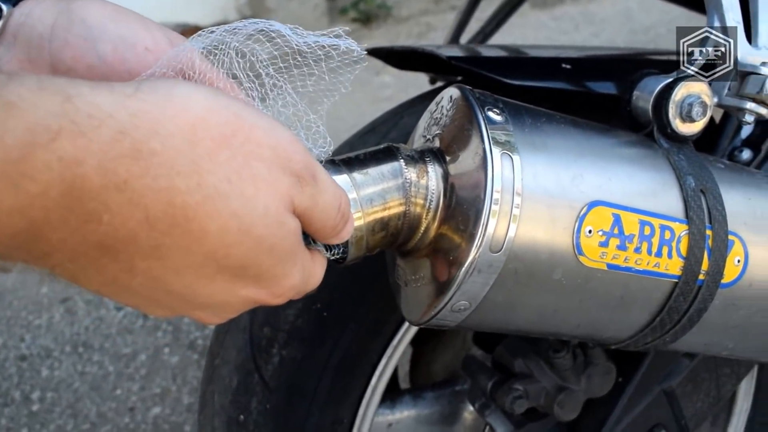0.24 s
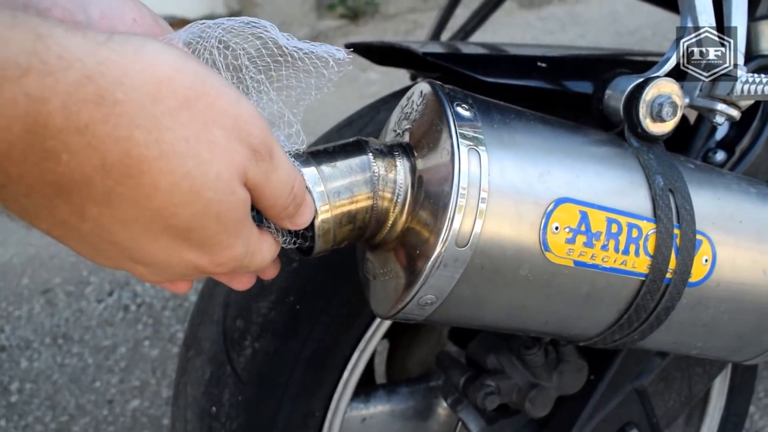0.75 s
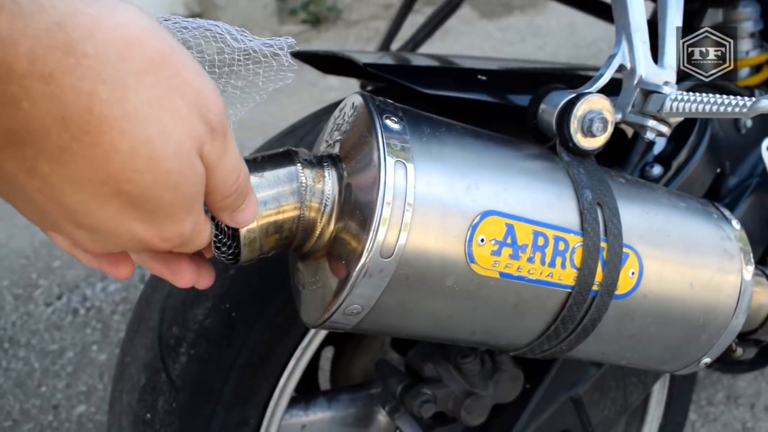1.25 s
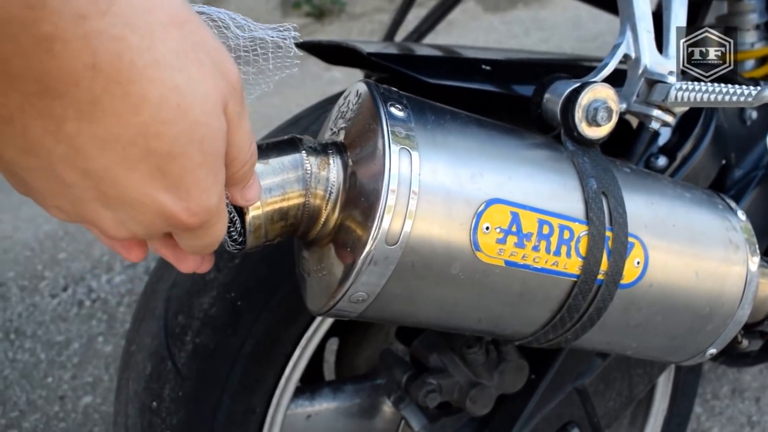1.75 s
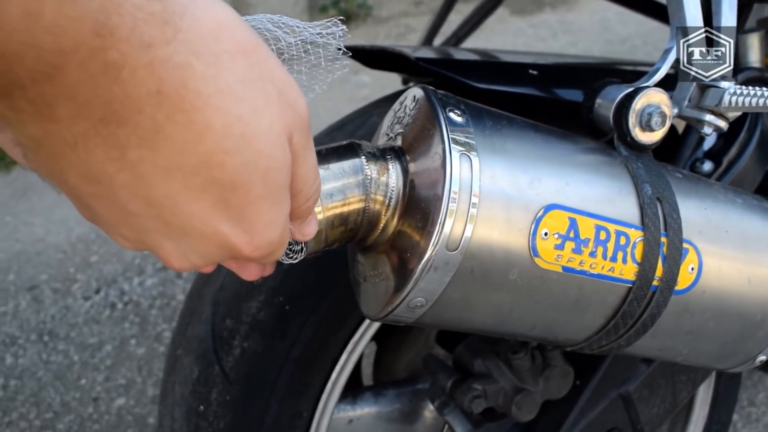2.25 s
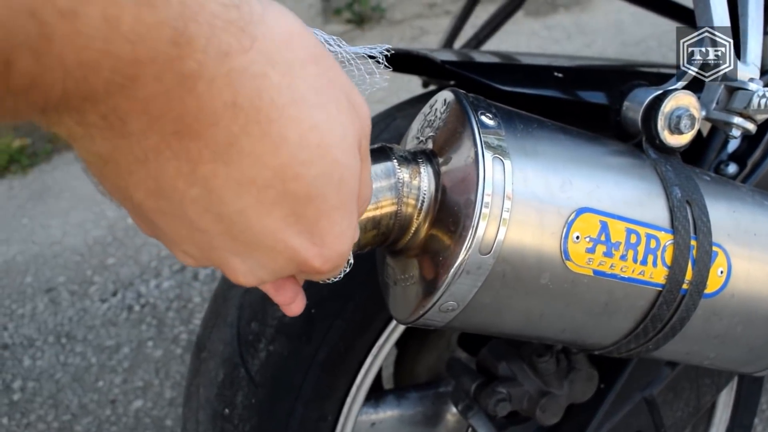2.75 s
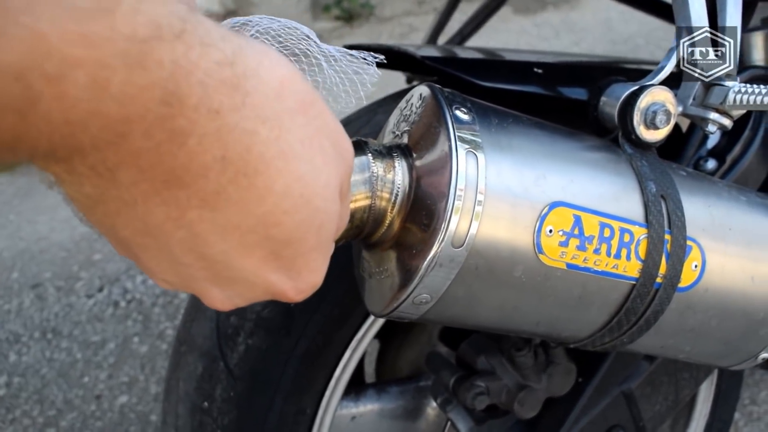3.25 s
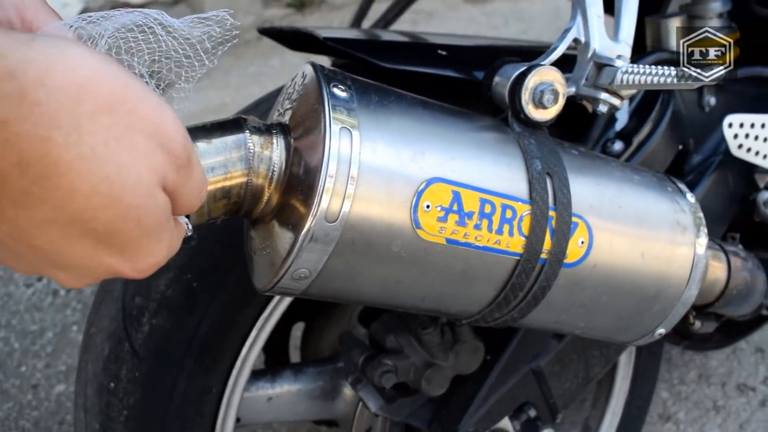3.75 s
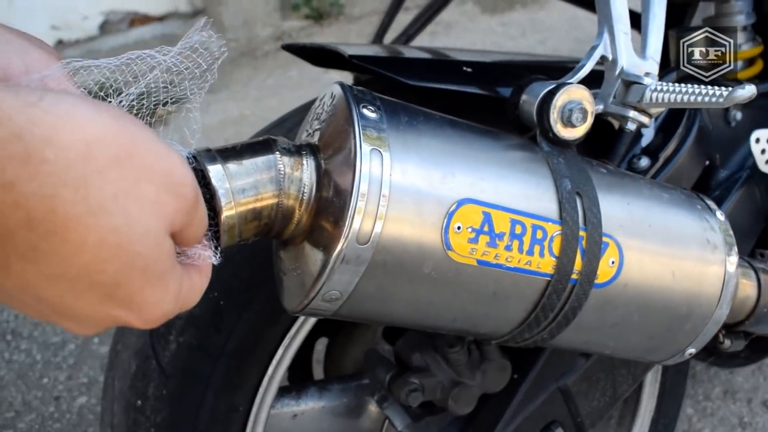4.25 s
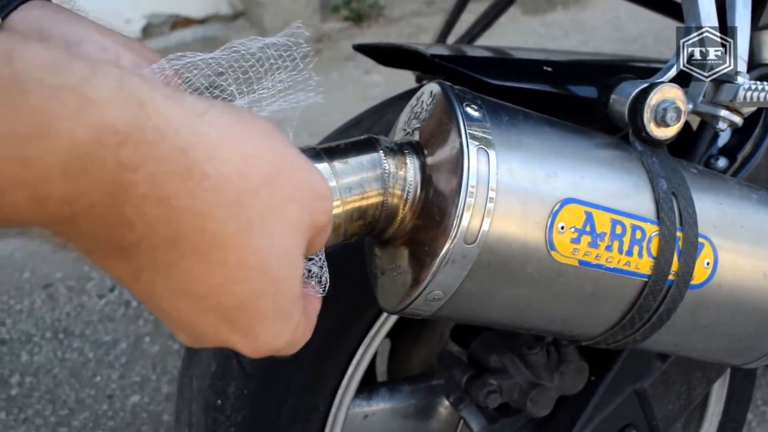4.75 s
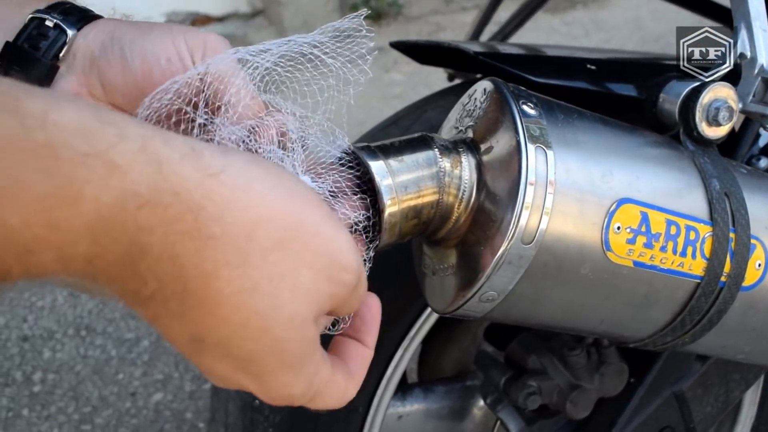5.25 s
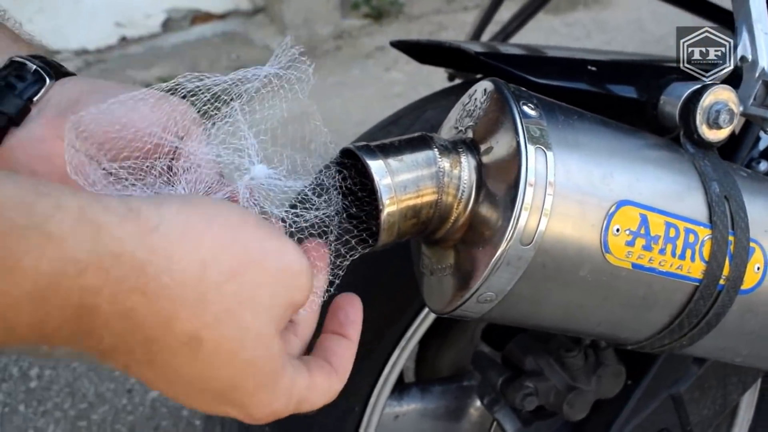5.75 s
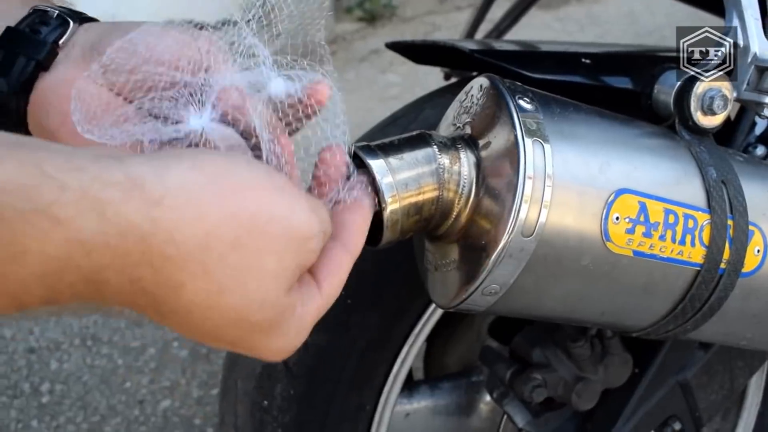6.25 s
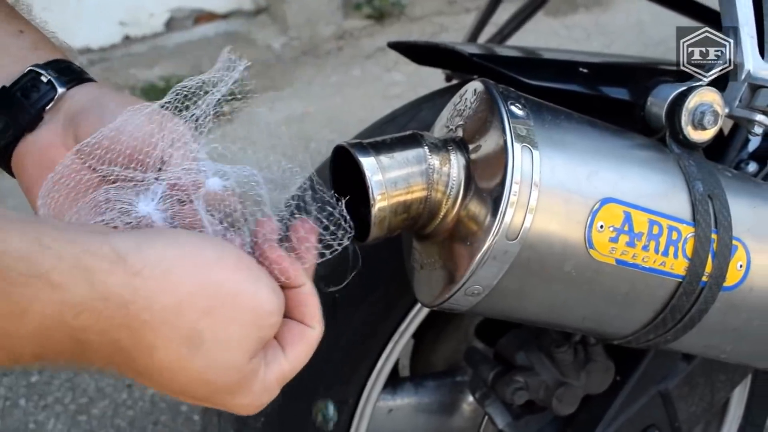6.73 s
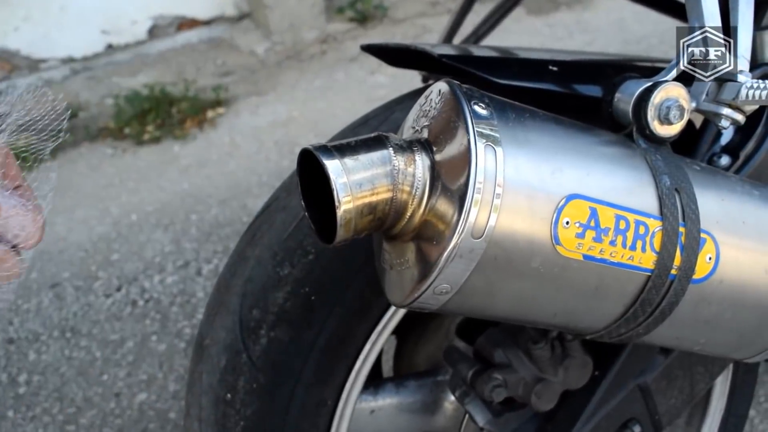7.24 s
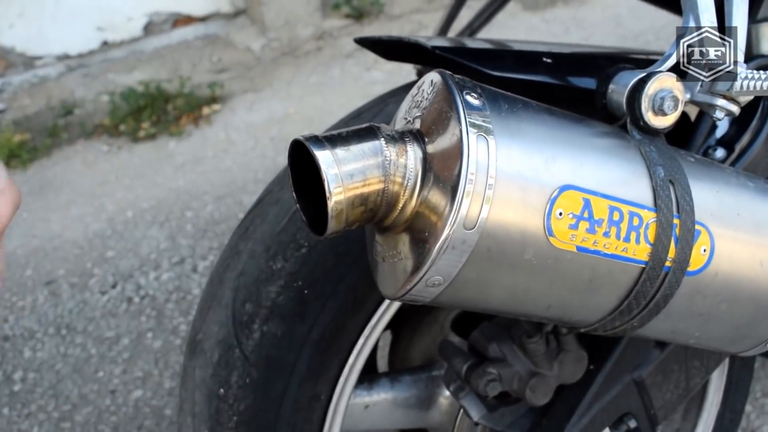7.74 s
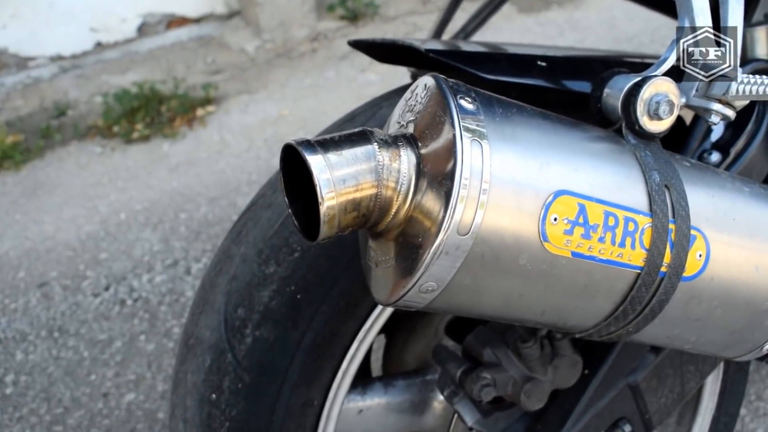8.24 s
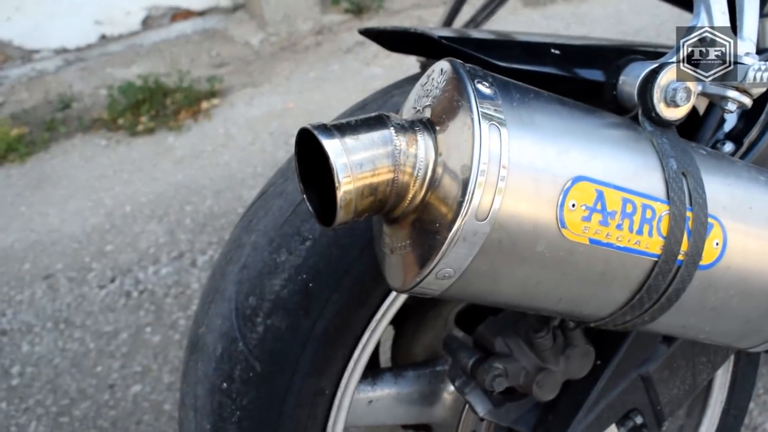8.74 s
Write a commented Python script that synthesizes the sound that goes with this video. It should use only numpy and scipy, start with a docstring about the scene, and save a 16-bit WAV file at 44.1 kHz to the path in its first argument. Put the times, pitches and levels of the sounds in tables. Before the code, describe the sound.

Glass marbles clatter down a hollow metal exhaust pipe, ringing and rattling, then a dropped marble bounces on asphalt before more knocks.

```python
"""Glass marbles poured into a silencer

Outdoors and close up, marbles are fed by hand into the steel tail pipe of a motorcycle silencer.
They knock and roll down the shell, whose ring is dying noise from weak modes, strong tones and a ping.
Others clunk and click in cupped hands or crack on the asphalt: pitched noise bursts and short notes.
Low thumps and a distant street lie beneath, and loud knocks overload the recorder."""
import sys
import numpy as np
from scipy import signal
from scipy.fft import rfft, irfft
from scipy.io import wavfile
from scipy.ndimage import uniform_filter1d

SR = 44100
rng = np.random.default_rng(int(sys.argv[2]) if len(sys.argv) > 2 else 0)


def dump(signal):
    """Clip the signal to [-1, 1] and save it as 16-bit WAV at the path in sys.argv[1]."""
    limited = np.clip(np.atleast_2d(signal).T, -1, 1)
    pcm = np.round(limited * 32767).astype(np.int16)
    wavfile.write(sys.argv[1], SR, pcm)


N = 396459  # length [samples]

# strength of the shell's many weak modes: (frequency [Hz], level [dB])
SHELL_LEVELS = [(180, -63), (300, -32.5), (878, -7.5), (1140, 1.5), (1330, -1), (1670, 0.5), (1850, -6.5),
                (3500, -8.5), (5670, -4.5), (8500, -4.5), (15500, -10)]
# left-right likeness of the shell's sound: (frequency [Hz], likeness [0-1])
SHELL_LIKENESS = [(60, 0.34), (180, 0.37), (550, 0.98), (1650, 1), (4970, 0.58), (15000, 0.043)]


def gain_of(db):
    """Turn decibels into an amplitude factor."""
    return 10 ** (np.asarray(db) / 20)


def evened(x):
    """Scale to an RMS of one."""
    return x / np.sqrt(np.mean(x ** 2) + 1e-20)


def read(points, hz):
    """Read a curve between its points along a logarithmic frequency axis."""
    f, value = np.transpose(points)
    return np.interp(np.log(hz + 1), np.log(f + 1), value)


def add(mix, s, sound):
    """Lay a stereo sound into the mix at s seconds, cutting what runs past the end."""
    part = mix[:, max(round(s * SR), 0):][:, :sound.shape[1]]
    part += sound[:, :part.shape[1]]


def pair(same, shape):
    """Complex noise for two microphones, alike by the share same."""
    a, b, c, d = np.moveaxis(rng.standard_normal(shape + (4,)), -1, 0)
    same = np.clip(same, -1, 1)
    left, other = a + 1j * b, c + 1j * d
    return np.array([left, same * left + np.sqrt(1 - same ** 2) * other])


def blow_colour(hz, boom_db, edge_db, ring_hz):
    """Tone balance of each blow in dB: low boom, glassy edge, and a lift near the favoured ring."""
    low = 1 / (1 + (hz / 1900) ** 6)
    high = 1 / (1 + (5000 / (hz + 1)) ** 4.7)
    near = np.exp(-(np.log((hz + 1) / ring_hz[:, None]) / 0.045) ** 2)  # the spot struck favours one region
    return np.outer(boom_db, low) + np.outer(edge_db, high) + 3.0 * near


def weak_modes(boom_db, edge_db, ring_hz, ring_s, size):
    """Countless weak shell modes merge into noise that dies at its own rate in each band."""
    # how long each band rings: (frequency [Hz], factor on the ring time)
    ring_factors = [(400, 1.2), (1100, 1.99), (2800, 1.046), (7000, 0.9), (14000, 0.46)]
    hz = np.fft.rfftfreq(256, 1 / SR)
    t = np.arange(size // 128 + 2) * 128 / SR
    dying_db = -60 * t[:, None] / (ring_s[:, None, None] * read(ring_factors, hz))
    dying = gain_of(dying_db) + gain_of(-21.5 + dying_db / 3.2)  # a faint slower tail lingers
    lumps_db = 2.1 * evened(uniform_filter1d(rng.standard_normal((len(ring_s), len(hz))), size=3))
    colour_db = read(SHELL_LEVELS, hz) + blow_colour(hz, boom_db, edge_db, ring_hz) + lumps_db
    z = pair(read(SHELL_LIKENESS, hz), dying.shape) * dying * gain_of(colour_db)[:, None]
    return signal.istft(z.swapaxes(2, 3), nperseg=256, noverlap=128)[1][..., :size]


def strong_modes(boom_db, edge_db, ring_hz, ring_s, size):
    """The round shell's strong modes ring as close pairs of decaying tones, woken unevenly by each blow."""
    # strong modes of the shell: (centre of the pair [Hz], width that sets split and decay [Hz], level [dB])
    modes = [(767, 24, -11), (1146.2, 60.5, 5.5), (1250, 30, -9), (1694.4, 50, -2), (1990, 60, -3.5),
             (2580, 44, -6.5), (2728, 40, -13), (2892, 47, -8.5), (3260, 30, -19.5), (3846, 22, -13),
             (4114, 72, -6), (4416, 34, -9.5), (5284, 210, 3.5), (5745, 80, 3), (6600, 54, -3.5),
             (8497, 47, -2), (9370, 40, -1), (9870, 140, -0.5)]
    hz, width, db = np.transpose(modes + modes)
    hz = hz + 0.24 * width * np.repeat([-1, 1], len(modes))
    t = np.arange(size) / SR
    tones = np.exp((2j * np.pi * hz)[:, None] * t)
    dying = (np.pi * .4 * width + 0.012 * hz)[:, None] * t
    tones = tones * (np.exp(-dying) + gain_of(-17.5) * np.exp(-dying / 4.0))  # quick loss, then a thin tail
    spread_db = 4.28 * rng.standard_normal((len(ring_s), len(hz)))
    colour_db = db + blow_colour(hz, boom_db, edge_db, ring_hz) + spread_db
    strong = ((pair(read(SHELL_LIKENESS, hz), spread_db.shape) * gain_of(colour_db)) @ tones).real
    # a hand or resting marbles damp short rings; rings above 0.095 s are held up instead
    return strong * gain_of(-8.0 * t * (1 / ring_s[:, None] - 10.5))


def struck_ping(boom_db, edge_db, ring_hz, ring_s, size):
    """The mode nearest the blow sings out as one decaying sine, slightly out of phase left to right."""
    t = np.arange(size) / SR
    own_colour_db = np.diag(blow_colour(ring_hz, boom_db, edge_db, ring_hz))
    ping_db = read(SHELL_LEVELS, ring_hz) + own_colour_db + 13
    fade = gain_of(ping_db[:, None] - 60 * t / (0.9 * ring_s[:, None]))
    phase = np.array([0, .0002])[:, None, None] * ring_hz[:, None]
    return fade * np.sin(2 * np.pi * ring_hz[:, None] * t + phase)


def shell_rings(boom_db, edge_db, ring_hz, ring_s, noise_db, size=8192):
    """One stereo ring per blow: weak modes as dying noise, strong modes as tones, and the ping."""
    blow = boom_db, edge_db, ring_hz, ring_s, size
    weak = weak_modes(*blow) * gain_of(noise_db)[:, None]
    strong = gain_of(0.5) * strong_modes(*blow)
    rise = 1 - np.exp(-np.arange(size) / SR / 0.0011)
    return (gain_of(-15) * (weak + strong + struck_ping(*blow)) * rise).swapaxes(0, 1)


def knocks():
    """Single marbles strike the pipe and the can, each blow setting its own boom, edge and ring time."""
    # knocks on the shell: (time [s], level [dB], glassy edge [dB], loudest ring [Hz])
    hits = [(0.0034, -1, -5.5, 3790), (0.0446, 4, -7, 2544), (0.0814, -3.5, -1, 5810),
            (0.119, 1.5, -0.5, 6040), (0.1901, 1.5, -8.5, 6100), (0.2312, 4.5, -26, 2890),
            (0.297, -6.5, -4, 5800), (0.3362, 1, -20, 2870), (0.3691, 3, -9.5, 2940),
            (0.445, 12.5, -15, 2838), (0.5213, 7, -16, 2880), (0.5876, 5.5, -9, 2913),
            (0.6566, 3.5, -30, 2970), (0.6839, 7.5, -8, 2896), (0.7573, -10.5, -9, 2550),
            (0.8892, 2, -3, 2860), (1.0233, -6.5, 6, 4830), (1.1628, -8.5, -4.5, 2870),
            (1.225, 0, -7, 2610), (1.3533, 7, -15, 2885), (1.4626, 3.5, -9, 5670), (1.51, 6.5, -14, 2905),
            (1.5903, 2.5, -4, 4520), (1.734, -4, -15, 5800), (2.0922, 2, -11, 2845),
            (2.1651, 3.5, -5, 2800), (2.3713, 8, -14, 2620), (2.4276, 3.5, -5, 2510),
            (2.4891, 2.5, -14, 2840), (2.5367, 5.5, -14.5, 1954), (2.5697, -3, -12, 3000),
            (2.6079, 4, -22, 2890), (2.6707, 8, -10, 4480), (2.7428, 6.5, -16, 2830),
            (2.7682, 3, -2.5, 6950), (2.792, 2, -19.5, 2630), (2.8536, 8.5, -13.5, 2600),
            (2.9016, 10, -10.5, 3820), (2.9618, 7.5, -18, 2877), (3.0214, 9, -11, 2690),
            (3.0981, 4, -16.5, 2730), (3.1117, 5.5, -15, 2750), (3.151, -1, -4.5, 5500),
            (3.197, 5.5, -35, 2580), (3.2143, -1, -17.5, 2685), (3.2738, 0, -25, 1640),
            (3.3316, -2, -6.5, 1620), (3.3837, 5, -24.5, 2860), (3.495, 7, -16.5, 2923),
            (3.5385, 8.5, -10.5, 2745), (3.5961, 4.5, -6.5, 4040), (3.627, 12, -7.5, 2757),
            (3.6733, 2.5, -18, 2630), (3.7172, -12, -33, 2580), (3.7436, 7.5, -22.5, 2600),
            (3.8286, 8, -13.5, 1710), (3.9125, -7.5, -19.5, 1660), (3.933, -10, -14, 2540),
            (3.9635, -8.5, -29, 2600), (4.005, 7.5, -4.5, 2600), (4.0674, -5, -15, 2580),
            (4.116, 9.5, -13.5, 4270), (4.1551, 1, -9, 3040), (4.1826, 3, -12, 3680),
            (4.2087, 2.5, -17.5, 2470), (4.2984, -3.5, -36, 2900), (4.3507, -17, -22, 2920),
            (4.443, -21.5, -26, 2610), (4.4709, 7.5, -6, 4400), (4.539, -5, -21, 2650),
            (4.5744, -9, -21, 2750), (4.5889, 3, -17.5, 2460), (4.6832, -6, -20, 2520),
            (4.761, -22.5, -32, 1355), (4.82, -21.5, -27, 1280), (5.4565, -29, -20, 1096),
            (5.4834, -34.5, -10, 1154), (5.4927, -39, -13, 1115), (5.8272, -44, -12, 1720),
            (6.1564, -37, -30.5, 1480), (6.325, -1, 3, 5670), (6.3795, -5.5, -18, 6040),
            (6.4023, -3, -14, 5780), (6.552, -19.5, -9, 5900), (6.5963, -5, -23, 1300),
            (6.6521, -13, 2.5, 5440), (6.6948, -13.5, -26, 1710), (6.7244, -12.5, -39, 1690),
            (6.7541, -5.5, -38, 2930), (6.7672, -5.5, -34, 1130), (6.8374, -24, -40, 1630),
            (6.8841, -8.5, -20, 2890), (6.901, -2.5, -10.5, 2600), (6.9312, -2.5, 3.5, 5760),
            (6.9667, -3.5, -1.5, 2520), (7.009, 0.5, -22, 2640), (7.0292, 1, -23, 2610),
            (7.0763, -8, -23, 2620), (7.1376, -28, -11, 4950), (7.3953, -37, -20, 1680),
            (7.638, -33.5, -18, 1700), (7.965, -18.5, -9, 4900), (8.6338, 5.5, -12.5, 2950),
            (8.776, 4, -13.5, 2950), (8.8244, -0.5, -13.5, 2574), (8.8483, -4, -2.5, 3050),
            (8.8766, 5.5, -11, 2660), (8.8964, 7, -8.5, 3310), (8.9476, 5.5, -16.5, 2550),
            (8.9814, -19, -21, 2840)]
    s, db, edge_db, ring_hz = np.transpose(hits)
    # the boom's share grows for softer knocks, a glassier edge and lower rings
    boom_db = -12.5 - 0.36 * db + 0.063 * edge_db - 2.0 * np.log2(ring_hz / 2700)
    # base ring time of 0.094 s at 2.7 kHz, shorter for high rings, varying by blow
    ring_s = 0.094 * (ring_hz / 2700) ** -0.43 * np.exp(0.26 * rng.standard_normal(len(s)))
    dense_ring, dense_until_s = 1.64, 3.25  # longer rings thicken the dense opening
    ring_s = np.clip(ring_s * np.where(s < dense_until_s, dense_ring, 1), .02, .3)
    noise_db = 0.15 * np.maximum(db, -25)  # hard knocks wake more weak modes; soft ones ring clearer
    out = np.zeros((2, N))
    for at, level_db, ring in zip(s, db, shell_rings(boom_db, edge_db, ring_hz, ring_s, noise_db)):
        add(out, at - .001, gain_of(level_db) * ring)
    return out


def rolling(count=40):
    """Marbles roll and jostle: many uneven small blows at random spots, each mixing dull and sharp rings."""
    # stretches of rolling, each a list of: (time [s], level [dB], glassy edge [dB])
    stretches = [
        [(0.0, -7, -3), (0.75, -7.5, 14.5), (1.28, -9, 16), (1.99, -11.5, 21), (2.62, -14, 14),
         (3.0, -14.5, 3.5), (3.35, -17, -10), (3.46, -26, -9.5), (3.85, -17, -4), (4.1, -33, -0.5),
         (4.42, -35, -4), (4.55, -36, -5.5), (4.68, -24, -21.5), (5.0, -53, -13)],
        [(6.35, -22, -5), (6.6, -40.5, -11), (6.93, -32, 5), (7.2, -31.5, -9)],
        [(8.15, -45.5, 3), (8.3, -31, 9), (8.39, -28.5, -12), (8.5, -32, -18), (8.62, -42, 7), (8.75, -33, -5),
         (8.85, -28, 3), (8.99, -32, 6)],
    ]
    blows_per_s = 330  # drawn over the whole scene, sounding only within the stretches
    s, db, edge_db = np.transpose(sum(stretches, []))
    at, size, spot = rng.random((round(blows_per_s * N / SR), 3)).T
    at = at * N / SR
    moving = sum((at > part[0][0] - .03) & (at < part[-1][0]) for part in stretches)
    uneven_db = -3.41 * np.log(np.maximum(size, .02))  # many small blows, few large
    level = moving * gain_of(np.interp(at, s, db) + uneven_db - 16.5)
    edge = gain_of(np.interp(at, s, edge_db))
    one, ring_hz = np.ones(count), np.geomspace(900, 7000, num=count)
    dull = shell_rings(2.8 * one, -24.5 * one, ring_hz, 0.12 * one, -1.5 * one, size=6000)
    sharp = shell_rings(-15. * one, -7.4 * one, ring_hz[::-1], 0.087 * one, -0.5 * one, size=6000)
    out = np.zeros((2, N))
    for blow, gain, bright, k in zip(at, level, edge, (spot * count).astype(int)):
        add(out, blow, gain * (dull[k] + bright * sharp[k]))
    return out


def crack(pitch_hz, spread, t, same=0.73):
    """Stereo noise gathered round one pitch by a bell-shaped filter on a log frequency axis."""
    hz = np.fft.rfftfreq(len(t), 1 / SR)
    bell = np.exp(-(np.log((hz + 1) / pitch_hz) / spread) ** 2)
    return evened(irfft(rfft(pair(same, t.shape).real) * bell, len(t)))


def clunks():
    """Marbles knock in cupped hands: a broad dull body, the hollow's short falling note, a treble spray."""
    # hollow knocks: (time [s], level [dB], hollow pitch at the start [Hz])
    hand_knocks = [(6.349, 2, 1090), (6.385, 3, 1123), (6.412, 2, 1467), (6.595, 3.5, 1320),
                   (8.183, -4.5, 1340), (8.259, -0.5, 1253), (8.293, -5.5, 1310), (8.322, -2.5, 1003),
                   (8.392, -15, 997), (8.458, -17, 1010), (8.475, -4.5, 1325), (8.508, -5.5, 1136),
                   (8.522, -9.5, 1400), (8.535, -5, 1413), (8.559, -17, 1140), (8.595, -24, 985)]
    fade_s = 0.064  # time for body and spray to fall 60 dB; the note falls 30 dB
    t, out = np.arange(6000) / SR, np.zeros((2, N))
    for s, db, hollow_hz in hand_knocks:
        body = crack(1.04 * hollow_hz, 0.67, t, same=0.98)
        body = body * (gain_of(-60 * t / fade_s) + gain_of(-16 - 25 * t / fade_s))  # with a slower tail
        note = np.sin(2 * np.pi * hollow_hz * (t - 0.41 * t ** 2)) * gain_of(-30 * t / fade_s)
        spray = crack(3600, 0.91, t) * gain_of(-13.5 - 60 * t / fade_s)
        rise = 1 - np.exp(-t / 0.00047)
        add(out, s, gain_of(db - 9.0) * (body + note + spray) * rise)
    return out


def bounces():
    """A dropped marble bounces on asphalt: a brief crack, a short tail, a dull body and a wall echo."""
    # bounces: (time [s], level [dB])
    landings = [(7.1916, -10.5), (7.2854, -11), (7.3379, -7.5), (7.4411, -10), (7.4614, -15.5),
                (7.5337, -8.5), (7.6164, -5), (7.7121, -6), (7.8535, -7.5), (7.9453, -9.5), (8.0192, -10.5),
                (8.0754, -11.5), (8.1194, -24)]
    wall_s, wall_db = 0.023, -29  # delay [s] and level [dB] of the echo from a wall nearby
    t, out = np.arange(4096) / SR, np.zeros((2, N))
    for s, db in landings:
        click = crack(5420, 0.57, t) * gain_of(-60 * t / 0.014)
        click += crack(3600, 0.92, t) * gain_of(-24.5 - 60 * t / 0.16)  # tail
        click += crack(1600, 0.77, t) * gain_of(-9.5 - 60 * t / 0.037)  # body
        add(out, s, gain_of(db - 8.0) * click)
        add(out, s + wall_s, gain_of(db + wall_db) * click[::-1])  # left and right swapped
    return out


def clinks(count=6):
    """Marbles touch in the hand: thin high ticks with a brief shimmer, some chattering on in rebounds."""
    # ticks: (time [s], level [dB], pitch [Hz], mean gap between rebounds [s], 0 for none)
    touches = [(5.343, -35, 5760, 0), (5.468, -13.5, 8600, 0.0143), (5.707, -18.5, 8200, 0.0077),
               (5.785, -36, 7500, 0), (6.2746, -26.5, 8000, 0.0043), (6.4344, -12.5, 7500, 0),
               (6.479, -22.5, 7400, 0.00064), (6.5707, -14.5, 8540, 0.0081), (6.5903, -14, 5210, 0.0027),
               (7.0775, -14, 5700, 0.0012), (8.209, -23, 5560, 0.018), (8.3444, -32, 5200, 0),
               (8.4672, -36, 5090, 0)]
    chatter_db, fade_db, spread_db = -11.5, -1.4, 3.5  # first rebound, change per rebound, unevenness
    t, out = np.arange(2048) / SR, np.zeros((2, N))
    dying = gain_of(-60 * t / 0.0052) + gain_of(-13.5 - 60 * t / 0.058)
    for s, db, pitch_hz, gap_s in touches:
        add(out, s, gain_of(db - 5) * crack(pitch_hz, 0.54, t) * dying)
        for k, (gap, size) in enumerate(rng.standard_normal((count * (gap_s > 0), 2))):
            tick_db = db + chatter_db + fade_db * k + spread_db * size
            tick = gain_of(tick_db) * crack(pitch_hz, 0.33, t) * dying
            add(out, s + gap_s * (k + 1 + .1 * gap), tick)
    return out


def thumps():
    """Short low thumps under the loudest knocks and some handling, without ring."""
    # low thumps: (time [s], peak level [dB])
    low_thumps = [(3.114, -33), (3.536, -26), (3.628, -19.5), (3.744, -29), (4.006, -23.5), (4.114, -38),
                  (4.47, -31.5), (6.322, -19.5), (8.63, -29.5)]
    u, out = np.arange(2500) / SR / 0.0023, np.zeros((2, N))
    swing = u * (1 - u / 2) * np.exp(-u)  # out, then back
    for s, db in low_thumps:
        add(out, s, gain_of(db) * swing / swing.max() * np.ones((2, 1)))
    return out


def street():
    """Distant traffic wash as drifting noise, a faint steady tone, slow air pressure on the microphones."""
    # spectrum of the wash: (frequency [Hz], relative level [dB per Hz])
    wash_levels = [(24, -31.5), (40, -4), (82, -12.5), (150, -25), (215, -16.5), (317, -25), (563, -22),
                   (818, -12.5), (1100, -15.5), (1770, -17.5), (2450, -22.5), (5000, -28), (15500, -40)]
    # left-right likeness of the wash: (frequency [Hz], likeness [0-1])
    wash_likeness = [(60, 0.61), (240, 0.91), (950, 0.95), (3770, 0.17), (15000, 0.15)]
    wash_db, whine_db, breeze_db = -49.5, -64.5, -42  # RMS levels
    frames, hz = N // 256 + 5, np.fft.rfftfreq(1024, 1 / SR)
    patches = uniform_filter1d(rng.standard_normal((frames, 513)), 14, 0)  # smooth over time
    patches = evened(uniform_filter1d(patches, 12, 1))  # and over frequency
    z = pair(read(wash_likeness, hz), (frames, 513)) * gain_of(read(wash_levels, hz) + 1.5 * patches)
    wash = evened(signal.istft(z.transpose(0, 2, 1), nperseg=1024, noverlap=768)[1][:, :N])
    t = np.arange(N) / SR
    whine = np.sqrt(2) * gain_of(whine_db) * np.sin(2 * np.pi * 2231 * t)
    swells_hz = np.geomspace(1.5, 22, num=24)
    breeze = evened(sum(np.sin(2 * np.pi * (f * t + rng.random())) / f for f in swells_hz))
    return gain_of(wash_db) * wash + whine + gain_of(breeze_db) * breeze


def scene():
    """Sum all the layers, with the right side slightly louder."""
    layers = knocks() + rolling() + clunks() + bounces() + clinks() + thumps() + street()
    return layers * gain_of([[-.3], [.3]])


def record(dry):
    """The overloaded recorder squeezes loud peaks, then a low-pass limits the band."""
    squeezed = 0.8 * dry / (1 + abs(dry) ** 3.54) ** (1 / 4.74)
    low_pass = signal.firwin(511, 15700, window=("kaiser", 9), fs=SR)  # edge in Hz
    return signal.oaconvolve(squeezed, low_pass[None], "same")


dry = scene()
out = record(dry)
dump(out)
```